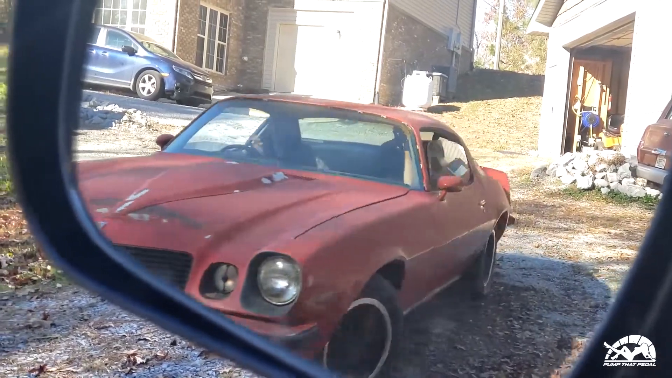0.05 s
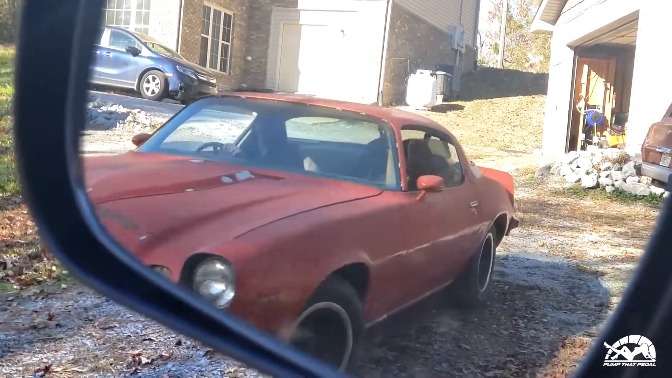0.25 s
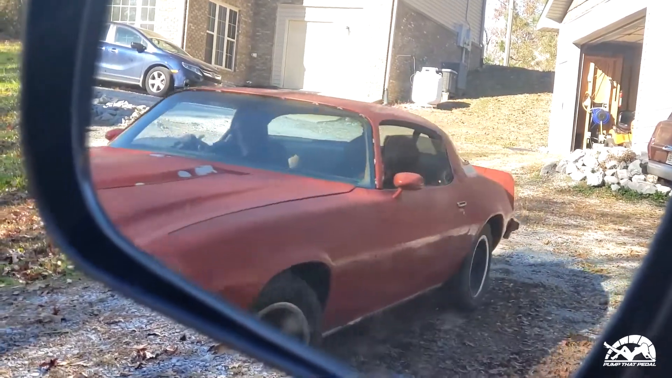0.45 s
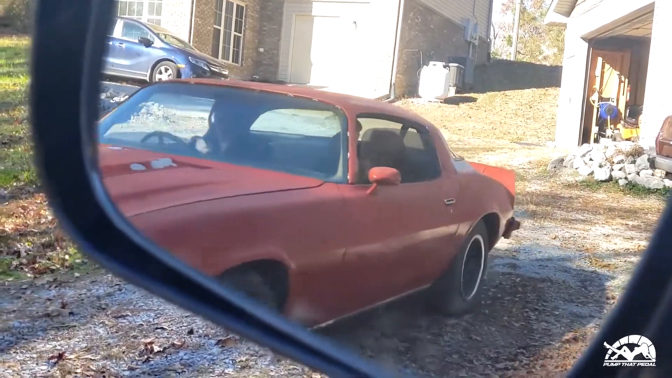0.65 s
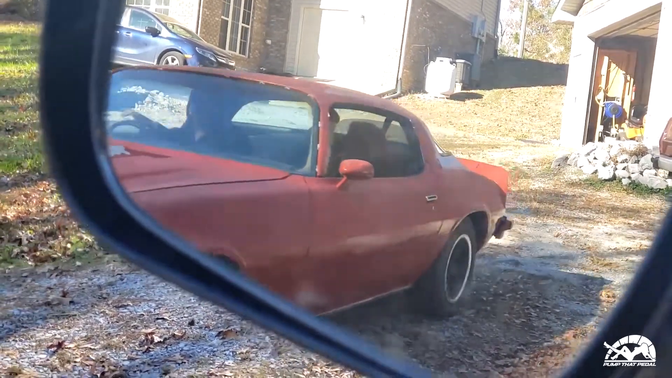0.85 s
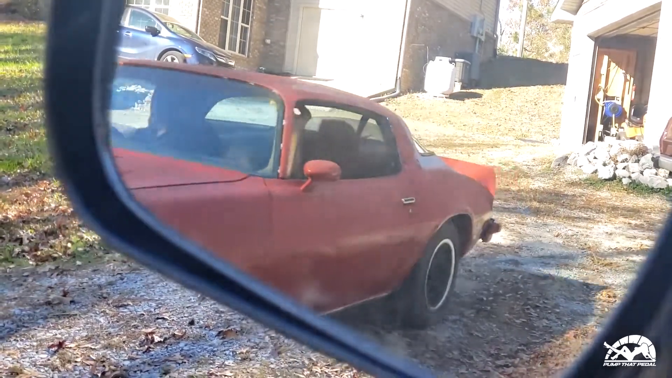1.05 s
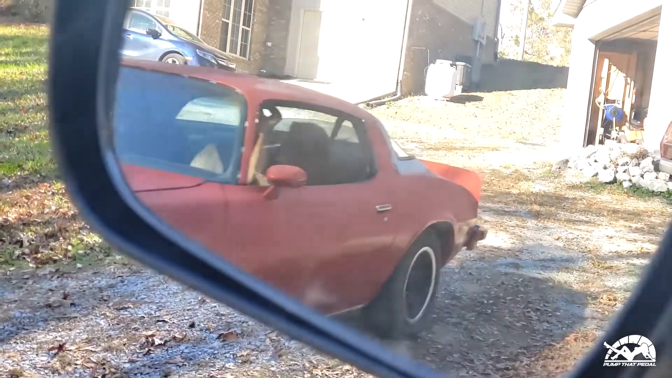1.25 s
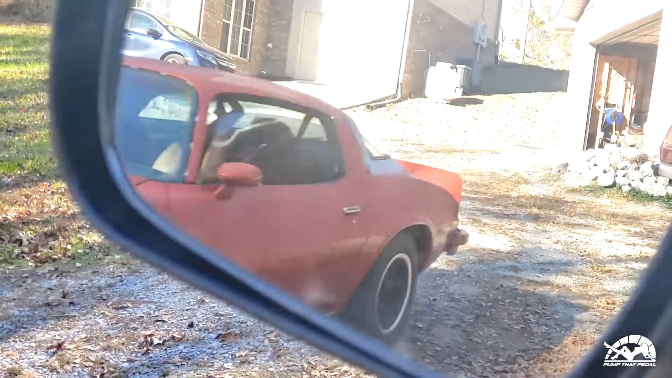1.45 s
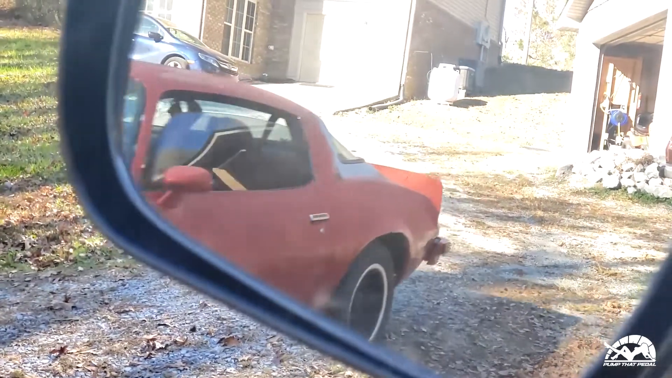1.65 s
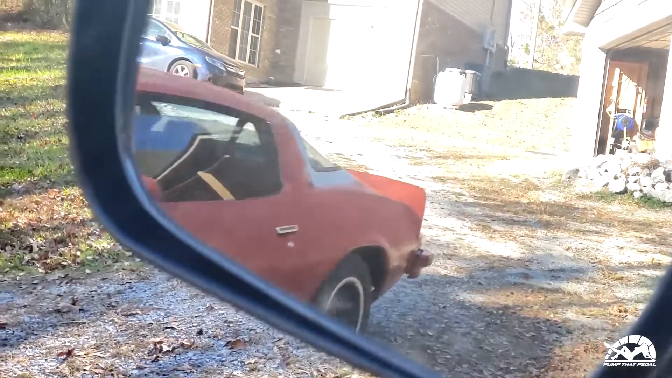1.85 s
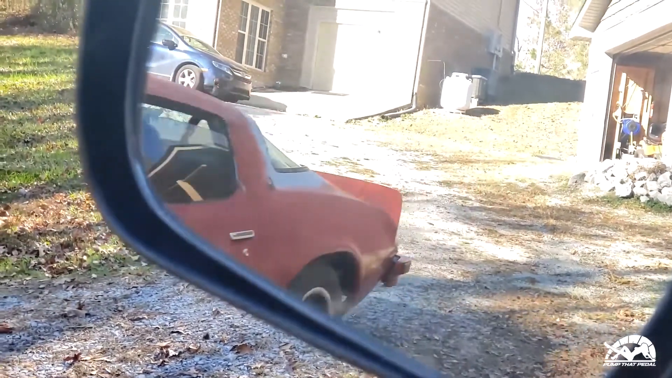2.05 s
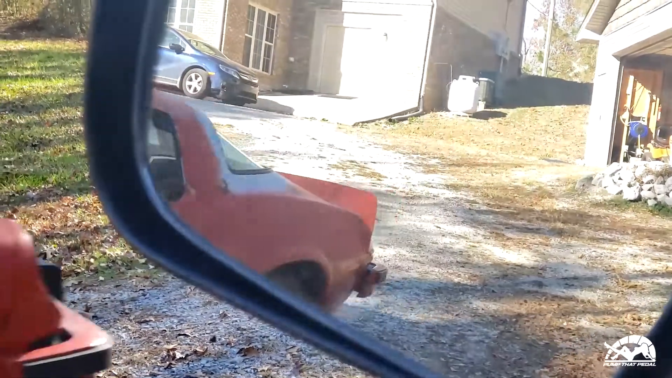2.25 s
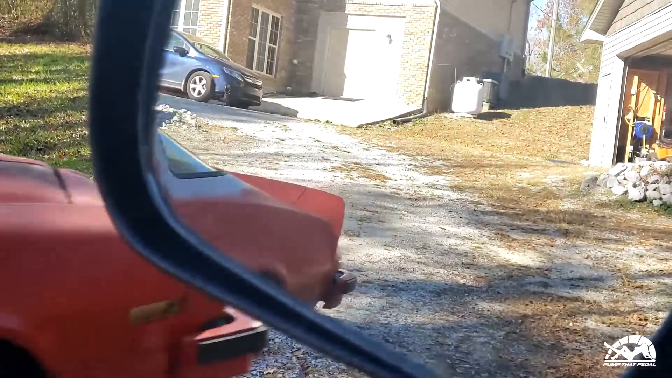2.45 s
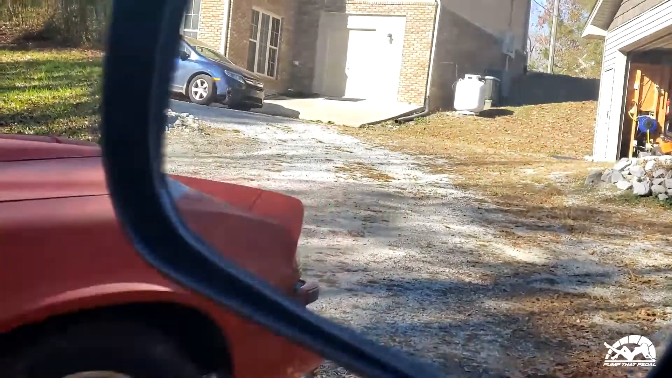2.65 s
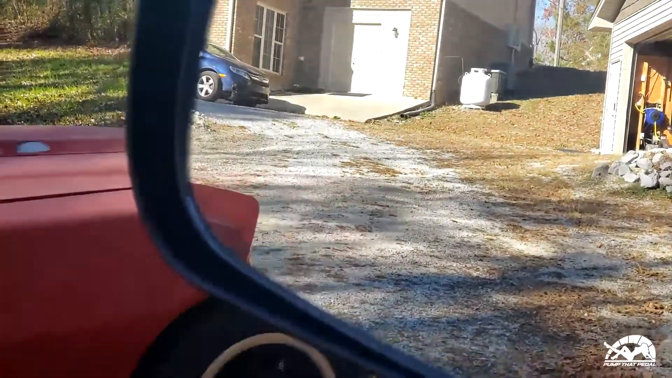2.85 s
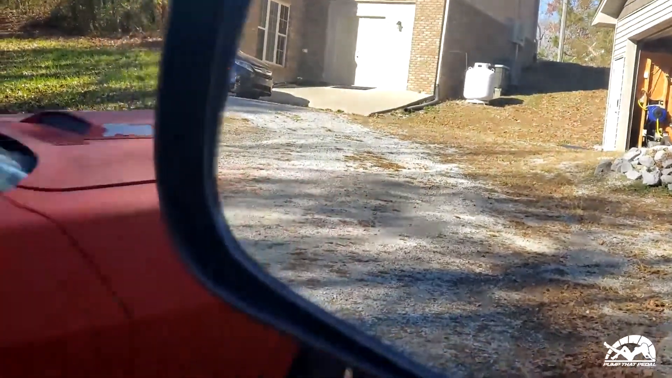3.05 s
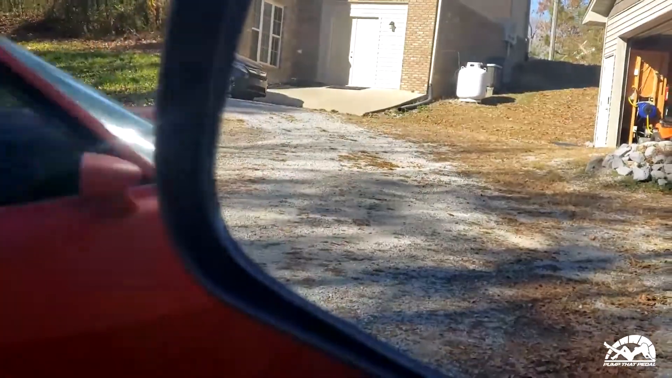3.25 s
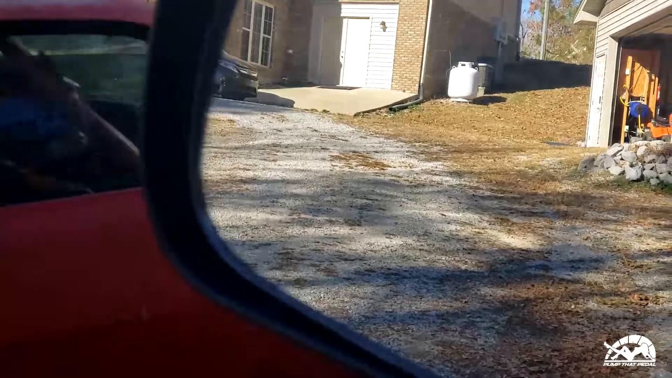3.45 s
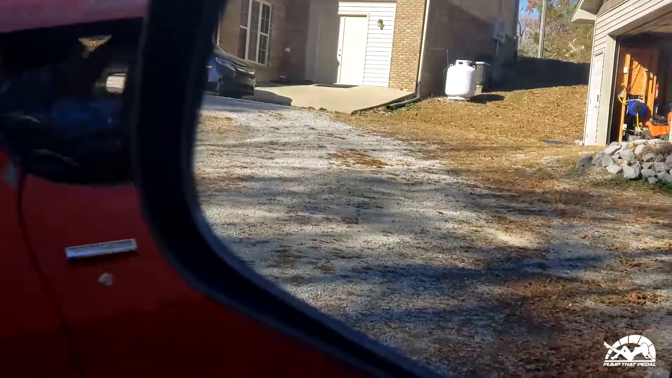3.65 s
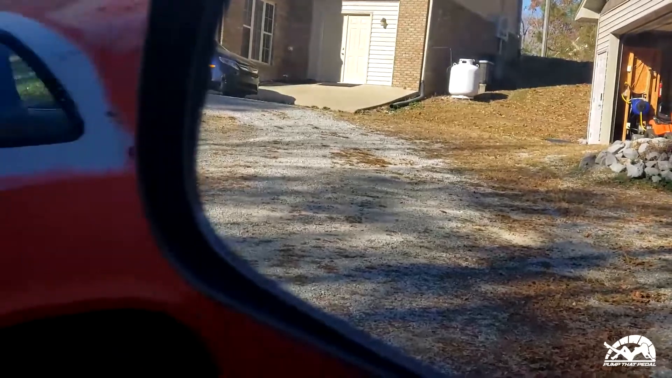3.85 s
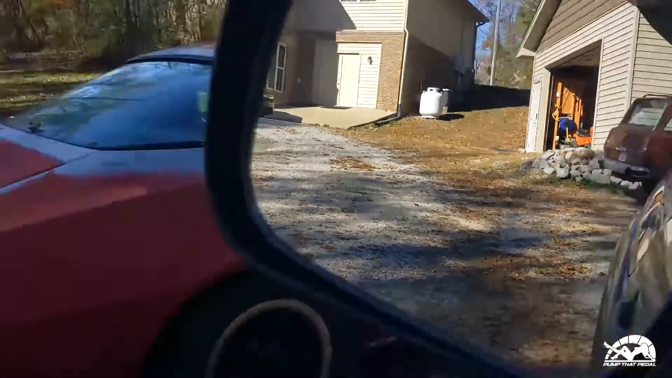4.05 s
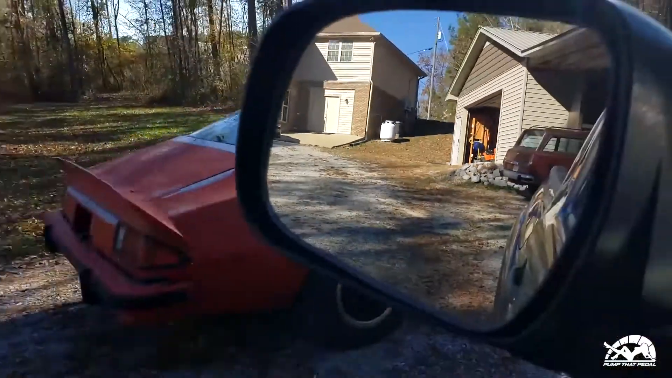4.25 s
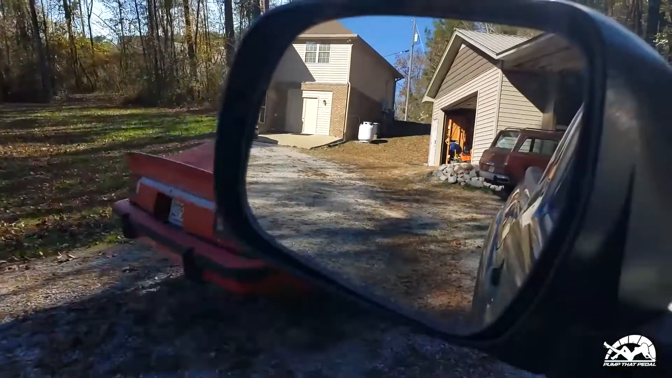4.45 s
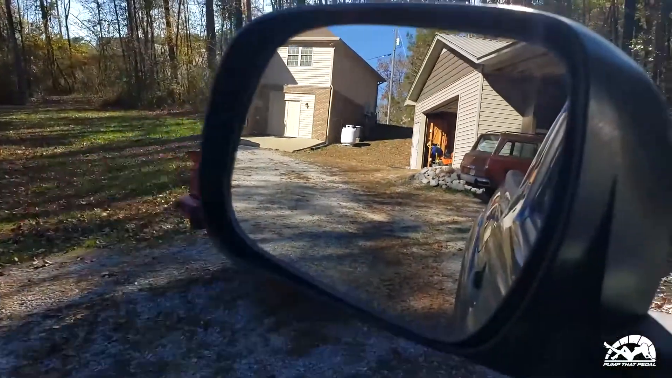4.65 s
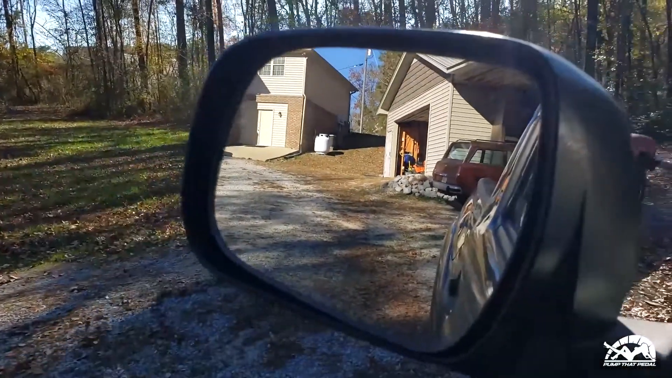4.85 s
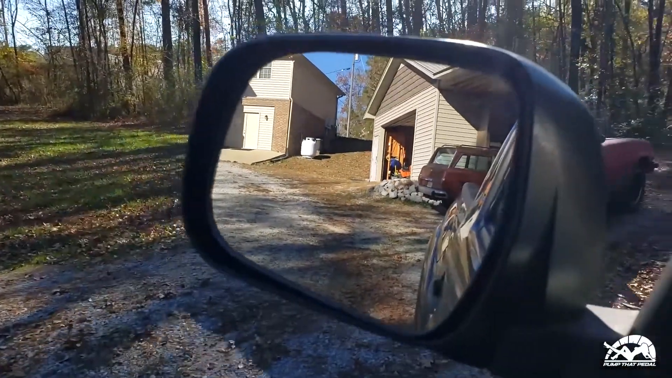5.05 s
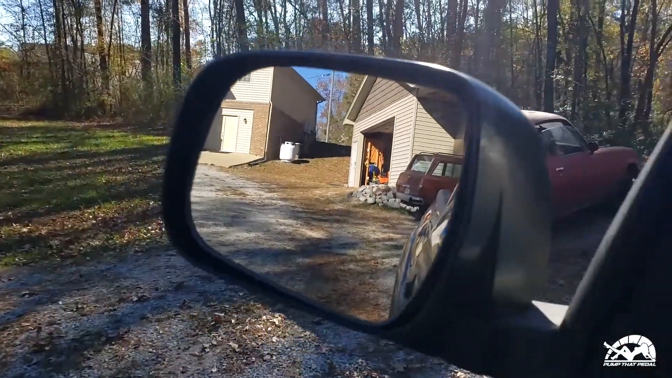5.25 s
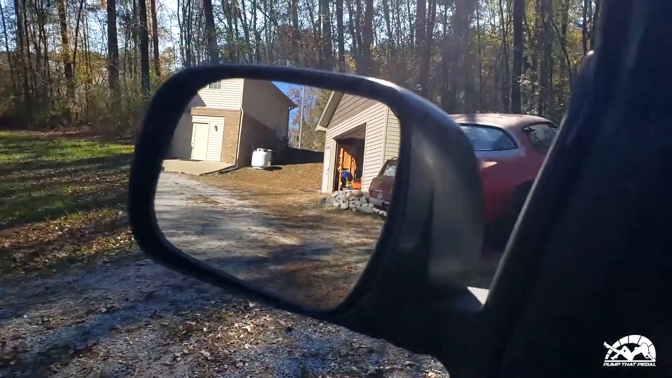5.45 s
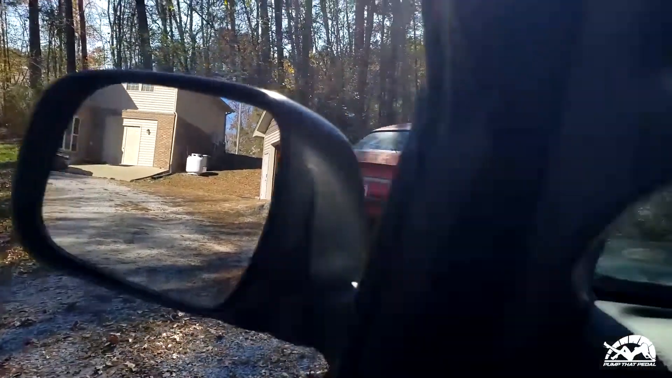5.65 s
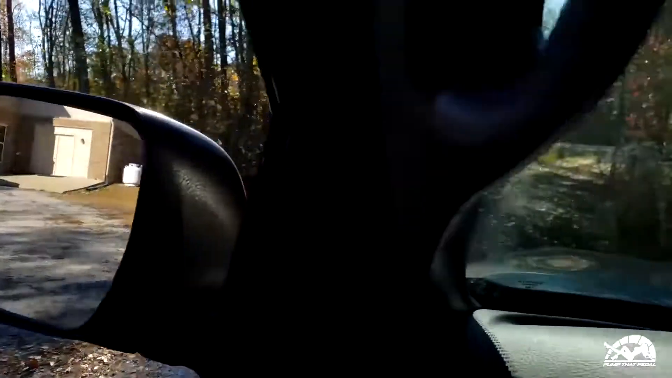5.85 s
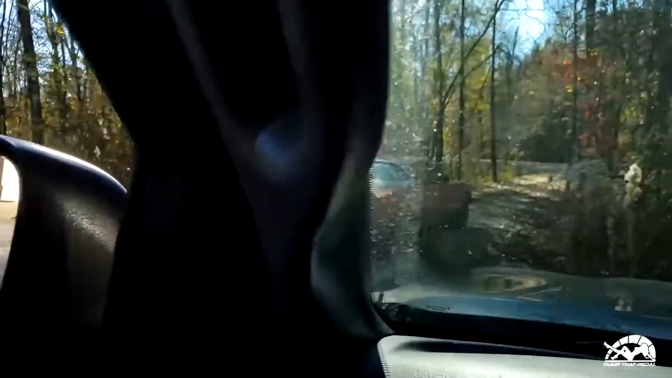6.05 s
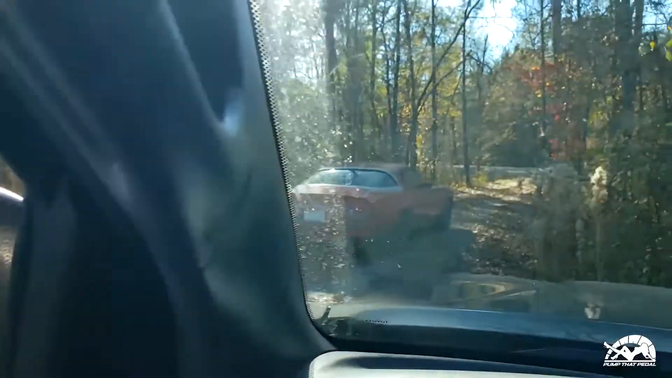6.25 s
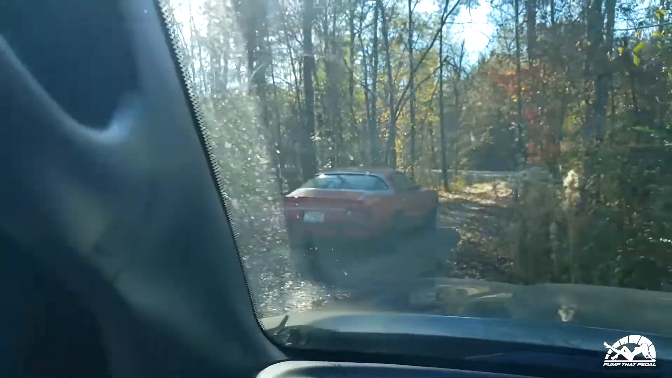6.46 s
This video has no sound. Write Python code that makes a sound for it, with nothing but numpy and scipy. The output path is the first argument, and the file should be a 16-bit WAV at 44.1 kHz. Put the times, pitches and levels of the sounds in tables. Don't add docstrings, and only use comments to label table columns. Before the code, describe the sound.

Outdoor stereo sound from a stationary car on a gravel drive: the slow, uneven throb of an old eight-cylinder engine gets closer, over grinding stones, sharp pebble knocks and brittle leaf crackles. The exhaust grows boomy, gulps air and revs up strongly as its tailpipes pass. Gravel detail thins, the engine note climbs, then the throttle closes and the pitch falls quickly as the car coasts away quietly.

```python
import sys
import numpy as np
from scipy import signal
from scipy.fft import rfft, irfft, next_fast_len
from scipy.io import wavfile
from scipy.ndimage import map_coordinates

SR = 44100
rng = np.random.default_rng(int(sys.argv[2]) if len(sys.argv) > 2 else 0)


def volts_from_db(level):
    exponent = np.asarray(level, float) / 20
    return 10 ** exponent


def persist_wave(psi):
    counts = np.round(np.clip(psi, -1, 1) * 32767).astype(np.int16)
    wavfile.write(sys.argv[1], SR, np.atleast_2d(counts).T)


N = 287002
TIME = np.arange(N) / SR
LIFT_OFF_S = (5.21, 5.29)
SETTLED_S = (3.8, 4.2)


def rms_one(x):
    return x / np.sqrt(np.mean(x ** 2) + 1e-20)


def in_time(rows):
    s, *columns = np.transpose(rows)
    return [np.interp(TIME, s, c) for c in columns]


def at_hz(points, hz):
    points = np.array(points)
    return np.interp(np.log(hz), np.log(points[:, 0]), points[:, 1])


def drift(rate):
    r = np.exp(-80 * np.pi * rate / SR)
    white = rng.standard_normal(N // 40 + 2002)
    slow = rms_one(signal.lfilter([1], [1, -2 * r, r * r], white)[2000:])
    return np.interp(np.arange(N) / 40, np.arange(len(slow)), slow)


def resonance(x, hz, width_hz):
    r = np.exp(-np.pi * width_hz / SR)
    poles = [1, -2 * r * np.cos(2 * np.pi * hz / SR), r * r]
    return signal.lfilter(np.array([1, 0, -1]) * (1 - r * r) / 2, poles, x)


def narrow_band(x, hz, width_hz):
    return resonance(resonance(x, hz, width_hz), hz, width_hz)


def filtered(x, order, hz, kind="low"):
    return signal.sosfilt(signal.butter(order, hz, kind, fs=SR, output="sos"), x)


def decay(length_s):
    return [1, -np.exp(-1 / (length_s * SR))]


def coloured(x, spectrum):
    size = next_fast_len(N + 4096)
    log_gain = at_hz(spectrum, np.arange(1, 2050) * SR / 4096) * np.log(10) / 20
    fold = irfft(log_gain) * np.r_[1, np.full(2047, 2), 1, np.zeros(2047)]
    response = irfft(np.exp(rfft(fold)))
    return irfft(rfft(x, size) * rfft(response, size), size)[..., :N]


def grains(per_s, spread_db):
    sizes = volts_from_db(spread_db * np.minimum(rng.exponential(1, N), 4)) * rng.choice([-1, 1], N)
    return sizes * (rng.random(N) < per_s / SR)


def spread_noise(alike):
    shared, *own = rng.standard_normal((3, N))
    return np.sqrt(alike) * shared + np.sqrt(1 - alike) * np.array(own)


# (time [s], four-stroke cycles per second [Hz])
SPEED = [(0, 6.1), (.6, 5.65), (1.05, 5.31), (1.6, 5.63), (2.2, 5.82), (2.7, 5.45), (3.2, 5.92),
         (3.48, 5.75), (3.6, 6.3), (3.8, 8.92), (4.05, 13.6), (4.3, 16.2), (4.63, 18.25), (5.2, 20.2),
         (5.3, 20.6), (5.4, 17.9), (5.8, 12.3), (6.4, 7.25)]


def crank():
    cycle_hz, = in_time(SPEED)
    return cycle_hz, np.cumsum(cycle_hz) / SR


def firing_tones(cycle_hz, turns, even_db):
    octave_db = -0.5 - np.clip(7 * (cycle_hz - 6), 0, 26.5)
    octave_db += np.interp(cycle_hz - 17.5, [0, 1, 3.3], [0, 11, 15])
    octave_db -= np.interp(TIME, LIFT_OFF_S, [0, 18]) * (cycle_hz > 9)
    even_db = even_db + np.interp(cycle_hz, [6.3, 7.5], [-3.5, 0])
    octave = volts_from_db(octave_db) * np.sin(32 * np.pi * turns + 1)
    return volts_from_db(even_db) * np.sin(16 * np.pi * turns) + octave


UNEVEN_DB = [-5, -10, -4, -6, -1.5, -7, -7]
UNEVEN_FAST_DB = [-3, -6, -5, 0, -5, -3, -1]
ORDER_TRIM = {4: -8, 6: -4, 7: -5, 9: 3, 10: 2, 11: 4, 13: 2, 18: -5, 19: -12, 23: -4}
# (cycle rate [Hz], level [dB])
BANK_DIP = [(11, 0), (14, -8), (18.5, -8), (20, 0)]
# (frequency [Hz], level [dB])
PIPE = [(20, -45), (45, -30), (60, -15), (75, 0), (92, -1), (107, -8), (125, -3), (150, -6), (175, -9),
        (210, -11), (240, -14), (280, -16), (330, -13), (420, -28)]
# (time [s], level of the 151 Hz mode [dB])
BARK = [
    (0, -5),
    (2.2, 8),
    (3.3, 2),
    (3.5, -4),
    (3.62, 8),
    (4.12, -2),
    (4.3, -15.5),
]


def uneven_orders(cycle_hz, turns, wobble_db=1.5):
    coarse = slice(None, None, 20)
    cycle_hz, turns, time = cycle_hz[coarse], turns[coarse], TIME[coarse]
    bark_db = in_time(BARK)[0][coarse]
    coasting = np.interp(time, LIFT_OFF_S, [0, 1])
    thinning_db = 17 * np.interp(time, *zip(*sorted([(5.5, 0), (4.51, 17)]))) / 17
    thinning_db = 17 * np.interp(time, (5.5, 4.51), [0, 1])
    orders, power = 0, 0
    for k in range(2, 48):
        if k in (8, 16):
            continue
        hz = k * cycle_hz
        slow_fast_db = [UNEVEN_DB[k % 8 - 1], UNEVEN_FAST_DB[k % 8 - 1]]
        db = np.interp(cycle_hz, [15, 19.5], slow_fast_db) * (k % 8 > 0)
        db += ORDER_TRIM.get(k, 0) * np.interp(cycle_hz, [17.5, 20], [1, 0])
        if k == 12:
            db += np.interp(cycle_hz, *np.transpose(BANK_DIP))
        if k > 12:
            db -= np.interp(cycle_hz, [16, 19], [0, 6])
        db -= {11: 10, 20: 3, 21: 4}.get(k, 0) * np.interp(cycle_hz, [11, 14], [0, 1])
        db += coasting * 7 / (1 + ((hz - 120) / 12) ** 2)
        db -= min(2.6 * max(k - 21, 0), 13) + coasting * np.clip((hz - 140) / 4, 0, 16)
        db -= np.clip((hz - 175) / 2, 0, 4 if k == 12 else 10)
        db -= thinning_db / (1 + (hz / 99.3) ** 6)
        gain = volts_from_db(db + at_hz(PIPE, hz) + bark_db / (1 + ((hz - 151.3) / 50) ** 2))
        power = power + gain ** 2
        tone = np.sin(2 * np.pi * (k * turns + rng.random()))
        orders = orders + gain * volts_from_db(wobble_db * drift(0.33)[coarse]) * tone
    return signal.resample_poly(orders / np.sqrt(power), 20, 1)[:N]


# (frequency [Hz], width [Hz], level [dB])
BOOM = [(76, 22, 0), (95, 20, -3), (120, 22, -4), (146, 25, -13)]


def misfires(cycle_hz, turns):
    fired = np.diff(np.floor(8 * turns), prepend=0)
    kicks = fired * rng.standard_normal(N) / np.sqrt(cycle_hz) + 1e-18
    rumble = 0
    for k, (hz, width, db) in enumerate(BOOM):
        rumble = rumble + (-1) ** k * volts_from_db(db) * resonance(kicks, hz, width)
    level_db = -9 - 1.5 * np.maximum(cycle_hz - 13.5, 0)
    level_db += 14 * np.exp(-((TIME - 5.29) / 0.1) ** 2)
    return volts_from_db(level_db) * rms_one(filtered(rumble, 3, [60, 170], "band"))


# (time [s], level [dB], firing tone over the uneven orders [dB])
LOAD = [(0, -38.5, 6), (.15, -35.5, 3), (.75, -31.5, -7), (1.05, -32.5, 5), (1.35, -30.5, -3),
        (2.3, -28, -5), (3.0, -23, -13), (3.5, -19.5, -34), (3.73, -21, 8), (3.88, -24.5, 16),
        (4.03, -19, -4), (4.27, -20, -2), (4.5, -24.5, 3.5), (5.05, -30, -3.5), (5.25, -30, -8.5),
        (5.65, -33.5, -1.5), (6.0, -40.5, 8.5), (6.5, -39, -11)]
# (time [s], level [dB])
STUMBLES = [(.48, -6), (1.048, -12.5), (1.46, -6.5), (3.38, -7), (3.54, -6), (2.0, -1.5), (2.22, 3.5),
            (5.31, 3), (5.87, -6), (5.99, 2.5), (6.13, -3), (6.34, -1)]


def exhaust(cycle_hz, turns):
    level_db, even_db = in_time(LOAD)
    level_db += sum(db * np.exp(-((TIME - s) / 0.04) ** 2) for s, db in STUMBLES)
    tones = firing_tones(cycle_hz, turns, even_db) + uneven_orders(cycle_hz, turns)
    return volts_from_db(level_db) * (np.sqrt(2) * tones + misfires(cycle_hz, turns))


# (frequency [Hz], width [Hz], level against the belt [dB])
BAY = [(3045, 380, -4.5), (4420, 510, -4)]
# (time [s], level [dB])
BONNET = [
    (0, 18.5),
    (1.3, 21),
    (2.4, -34),
    (4, -4),
]


def engine_bay():
    belt = volts_from_db(-33.5) * rms_one(narrow_band(rng.standard_normal(N), 6110, 150))
    gear = sum(volts_from_db(db) * rms_one(narrow_band(rng.standard_normal(N), hz, width)) for hz, width, db in BAY)
    return volts_from_db(in_time(BONNET)[0]) * (belt + volts_from_db(-30) * gear)


# (frequency [Hz], spectral level [dB per Hz])
GRAVEL = [(120, -30), (200, -6), (260, 3), (330, -2.5), (430, -4.5), (530, -1.5), (600, -5), (680, 1.5),
          (866, -1), (1190, -8.5), (1900, -7), (2640, -15), (3300, -15.5), (4330, -21.5), (5410, -29),
          (6140, -22), (7090, -61.5), (9000, -60.5), (11700, -61), (19800, -120)]


def gravel(level_db):
    grind = rms_one(grains(1200 * volts_from_db(3.2 * drift(16)), spread_db=5.0))
    grind *= np.interp(TIME, SETTLED_S, [.8, .08])
    rush = rms_one(coloured(grind + spread_noise(alike=.45), GRAVEL))
    return volts_from_db(level_db + 1.2 * drift(7)) * (rush + engine_bay())


def chips(level_db):
    pitches_hz = (560, 780, 1000, 1150, 1500)
    rings = 0
    for hz in pitches_hz:
        clicks = grains(70 / len(pitches_hz), spread_db=2.5) + 1e-18
        rings = rings + resonance(clicks, hz, .3 * hz) * np.sqrt(1 / hz)
    return volts_from_db(level_db - 8) * rms_one(rings)


# (time [s], level [dB])
RUSH = [(0, -54), (2.5, -57.5), (3.2, -37), (3.6, -48), (4, -46.5), (4.2, -39.5), (4.6, -40.5), (5.0, -43),
        (5.25, -39.5), (5.4, -39), (5.8, -52.5), (6.5, -79)]
# (frequency [Hz], spectral level [dB per Hz])
ROAR = [(250, -18), (340, -3), (470, -13), (580, 0), (720, 0), (780, -10), (870, -4), (1000, -7),
        (1700, -12), (1820, -10), (2300, -16), (2700, -32), (3800, -33), (8000, -52)]


def roar(cycle_hz, turns):
    puffs = 1 + .076 * np.cos(16 * np.pi * turns) + .3 * np.cos(10 * np.pi * turns)
    late = turns + .0002 * cycle_hz * drift(40)
    cylinder = np.floor(8 * np.maximum.accumulate(late)).astype(int)
    strength_db = np.array([0, -10, -3, -16, -1, -7, -18, -9])
    fronts = np.diff(cylinder, prepend=0) * volts_from_db(strength_db)[cylinder % 8]
    rattle = rng.standard_normal(600) * np.exp(-np.arange(600) / (.004 * SR))
    rasp = rms_one(filtered(signal.fftconvolve(fronts, rattle)[:N], 2, 1500))
    gas = puffs * spread_noise(alike=.6) + np.interp(TIME, LIFT_OFF_S, [.9, .1]) * rasp
    return volts_from_db(in_time(RUSH)[0] + 1.8 * drift(3.4)) * rms_one(coloured(gas, ROAR))


# (frequency [Hz], width [Hz], level against the roar, throttle open [dB], shut [dB])
WHINES = [(700, 55, -7, -16), (600, 45, -9, -22), (840, 40, -15, -8), (1820, 80, -15, -24),
          (2020, 100, -24, -15), (3850, 200, -26, -35), (3620, 260, -35, -24), (4690, 200, -40, -29),
          (5350, 250, -34, -27), (5780, 200, -34, -28)]


def whines():
    white, song = rng.standard_normal(N), 0
    for hz, width, *open_shut_db in WHINES:
        level = volts_from_db(np.interp(TIME, LIFT_OFF_S, open_shut_db))
        song = song + level * rms_one(narrow_band(white, hz, width))
    return volts_from_db(in_time(RUSH)[0]) * song


# (time [s], peak level [dB], length [s])
CRUSH = [(0.5, -54, 0.0095), (1.235, -27.5, 0.042), (1.253, -44, 0.024), (1.56, -56, 0.017),
         (1.845, -38, 0.012), (2.068, -41, 0.014), (2.088, -46, 0.01), (2.17, -37, 0.016),
         (2.273, -63, 0.022), (2.664, -41, 0.023), (2.681, -35.5, 0.056), (2.72, -54, 0.025),
         (2.764, -39, 0.013), (2.825, -40, 0.036), (3.063, -49, 0.028), (3.105, -40, 0.033),
         (3.161, -41, 0.013), (3.284, -46, 0.033), (3.383, -37, 0.013), (3.396, -27, 0.037),
         (3.694, -38, 0.018), (3.724, -39, 0.035), (3.968, -35.5, 0.05), (3.995, -33.5, 0.035),
         (4.407, -52, 0.067), (4.506, -52, 0.061), (4.612, -51, 0.016), (4.89, -49, 0.044),
         (5.29, -57.5, 0.61), (5.349, -59, 0.0097), (5.405, -70, 0.011), (5.66, -68, .012),
         (5.594, -61, 0.015)]
# (time [s], peak level [dB])
SNAPS = [(0.3172, -39), (0.446, -36), (0.505, -30), (0.595, -30), (0.7577, -35), (0.7853, -25),
         (0.896, -32), (1.033, -32), (1.1966, -37), (1.243, -29), (1.3588, -33), (1.422, -29),
         (1.568, -31.5), (1.673, -27.5), (1.8403, -34), (1.9784, -41.5), (2.0635, -18), (2.072, -18),
         (2.0808, -19), (2.0847, -23), (2.095, -21), (2.1107, -22.5), (2.1377, -31), (2.171, -21),
         (2.2695, -31), (2.281, -29), (2.4037, -37), (2.6668, -35), (2.6848, -38), (2.699, -26),
         (2.717, -26), (2.726, -32), (2.7611, -36), (2.8115, -36), (2.818, -32.5), (2.9496, -32),
         (2.99, -31), (3.049, -38), (3.074, -32), (3.114, -42), (3.163, -34), (3.1807, -26), (3.269, -21.5),
         (3.276, -28), (3.312, -36), (3.3744, -32), (3.3952, -30), (3.4042, -39.5), (3.414, -25),
         (3.6965, -47), (3.7234, -33), (3.7747, -29), (3.9809, -39), (3.9926, -33), (4.4154, -38),
         (4.4518, -41), (4.52, -47), (4.6045, -42), (5.5853, -47), (6.4023, -54)]
# (frequency [Hz], spectral level [dB per Hz])
LEAVES = [(1470, -10), (2500, 1), (3090, 0.5), (5050, -1.5), (6550, -1.5), (7600, -7.5), (9500, -4),
          (12400, -0.5), (15100, -0.5), (16100, -17.5), (16500, -11.5)]


def leaves(tyre_db):
    rustle_db = tyre_db - 16 - 7.5 * np.clip((TIME - 4.22) / 0.32, 0, 1)
    rustle_db -= 22 * np.maximum(TIME - 5.2, 0)
    effort = np.zeros(N)
    for s, db, length in CRUSH:
        after = slice(round(s * SR), round((s + 3 * length) * SR))
        age = TIME[after] - s
        effort[after] += volts_from_db(db - 10.5) * np.minimum(age / 0.00095, 1) * np.exp(-(age / length) ** 2)
    cracks = rms_one(signal.lfilter([1], decay(.0015), np.abs(grains(300, spread_db=1.6))))
    gate = effort * (1.2 * cracks + .2)
    gate += volts_from_db(rustle_db + 1.5 * drift(6)) * (.2 * cracks + .9)
    s, db = np.transpose(SNAPS)
    snapped = np.bincount((s * SR).astype(int), volts_from_db(db - 12.5), N)
    gate += signal.lfilter([1], decay(.0025), snapped + 1e-18)
    return gate * rms_one(coloured(spread_noise(alike=.35), LEAVES)) / 1.17


# (time [s], peak level [dB], frequency [Hz])
STONES = [(0.033, -16, 1530), (0.188, -27, 1150), (0.234, -27, 606), (0.505, -28, 1120), (0.616, -22, 630),
          (0.631, -22.5, 1150), (0.638, -18.5, 900), (0.661, -22.5, 1090), (0.786, -26.5, 694),
          (0.924, -36, 600), (1.41, -20, 710), (1.417, -15, 860), (1.514, -25, 665), (1.672, -14.5, 490),
          (1.715, -18, 1660), (1.877, -24, 1240), (2.026, -21.5, 673), (2.133, -23.5, 890),
          (2.171, -21.5, 563), (2.28, -18.5, 930), (2.601, -18.5, 685), (2.642, -21, 450),
          (2.769, -18.5, 710), (2.956, -15.5, 690), (2.966, -18, 625), (2.972, -26, 650), (3.118, -19, 655),
          (3.201, -17, 820), (3.276, -20.5, 520), (3.404, -20, 547), (3.553, -19.5, 940), (3.62, -22, 706),
          (3.744, -25, 780), (4.782, -32, 1000), (5.015, -42, 1040), (5.287, -29.5, 910)]
# (time [s], peak level [dB], frequency [Hz])
PEBBLES = [(0.093, -24, 1190), (0.214, -49, 657), (0.302, -26.5, 606), (0.607, -24.5, 505),
           (0.878, -37, 655), (0.896, -29, 509), (1.279, -27, 536), (1.318, -48, 686), (1.566, -30, 640),
           (1.62, -34, 565), (1.75, -44, 581), (1.79, -28, 1200), (1.928, -40, 477), (1.985, -27.5, 1300),
           (2.265, -39, 1080), (2.737, -21.5, 802), (2.808, -21.5, 799), (2.914, -35, 778),
           (2.93, -24.5, 729), (2.993, -26, 530), (3.297, -19.5, 1290), (3.313, -26, 493),
           (3.533, -26.5, 584), (3.668, -29, 705), (3.776, -21.5, 710), (4.344, -38, 646),
           (4.368, -33, 690), (4.758, -34, 794), (5.045, -46, 630), (5.412, -45, 842), (5.531, -50, 830),
           (5.653, -42, 487), (5.81, -48, 633), (5.877, -52, 506), (5.901, -47, 670), (6.08, -43.5, 900),
           (6.255, -47, 700), (6.324, -46, 818), (6.46, -51, 470)]


def stones():
    out, time = np.zeros(N + 4000), np.arange(4000) / SR
    for s, db, hz in [*STONES, *[(s, db - 0.5, hz) for s, db, hz in PEBBLES]]:
        chance, size = rng.random((2, 4000))
        slips = (chance < 1100 / SR) * (2 * size - 1) * np.exp(-time / .009)
        slips[0] = 1.3
        pop = resonance(slips, hz, 0.32 * hz) - 0.35 * resonance(slips, 2.3 * hz, 1.4 * hz)
        at = round(s * SR)
        out[at:at + 4000] += volts_from_db(db) * pop / np.abs(pop).max()
    return filtered(out[:N], 2, [300, 2700], "band")


# (time [s], level [dB])
THROAT = [
    (3.4, -47),
    (3.65, -36),
    (4.0, -38),
    (4.4, -42),
    (4.7, -54),
    (5.3, -66),
]
# (frequency [Hz], width [Hz], level [dB])
THROAT_HZ = [(220, 63, 1.5), (321, 79, -2.5), (392, 87, -6.5)]


def intake(turns):
    air = (1 + .7 * np.cos(16 * np.pi * turns)) * rng.standard_normal(N)
    hollow = sum(volts_from_db(db) * narrow_band(air, hz, width) for hz, width, db in THROAT_HZ)
    return volts_from_db(in_time(THROAT)[0]) * rms_one(hollow)


def hidden(x):
    return x + np.interp(TIME, (4.13, 4.6), [0, 1]) * (filtered(x, 1, 1980) - x)


def yard(x, t60=0.09):
    time = np.arange(8000) / SR
    tails = rng.standard_normal((2, 8000)) * volts_from_db(-60 * time / t60) * (time > .001)
    return signal.fftconvolve(x[None], tails / np.sqrt(np.sum(tails[0] ** 2)), axes=1)[:, :N]


# (frequency [Hz], width [Hz], share added [ratio])
FRAME = [(800, 200, -.6), (1170, 380, 1.0), (1590, 240, -.75)]


def framed(x):
    echo = sum(share * resonance(x, hz, width) for hz, width, share in FRAME)
    return x + np.interp(TIME, (0.18, 2.7), [1, .3]) * echo


# (time [s], lead of the left port [samples])
LEAD = [
    (1.2, 25),
    (2.2, 21),
    (2.8, 14),
    (3.8, 8),
    (4.4, -2),
    (5.3, -2),
    (5.8, 3),
    (6.3, 14),
]
# (frequency [Hz], level [dB])
SHADE_BEHIND = [(60, 2.5), (110, 2.5), (200, 3.0), (380, 4.0), (700, -0.5), (1290, 3.0), (2380, 12.5),
                (4400, 5.0), (8120, 1.5), (15000, 4.5)]
SHADE_AHEAD = [(60, 2.5), (110, 3.0), (200, 4.0), (380, 5.0), (700, 7.0), (1290, 8.5), (2380, 10.5),
               (4400, 9.0), (8120, 10.0), (15000, 10.5)]


def ports(boom, rest):
    lead, = in_time(LEAD)
    low = signal.sosfiltfilt(signal.butter(3, 810, fs=SR, output="sos"), rest[0])
    left = 0
    for x, share in ((boom[0] + rest[0] - low, 1), (low, 0.39)):
        left = left + map_coordinates(x, [np.arange(N) + share * lead], order=3, mode="nearest")
    behind = coloured(boom[1] + rest[1], np.array(SHADE_BEHIND) * [1, -1])
    ahead = coloured(boom[1] + rest[1], np.array(SHADE_AHEAD) * [1, -1])
    return np.array([left, behind + np.interp(TIME, (1.4, 4.33), [0, 1]) * (ahead - behind)])


# (time [s], level [dB])
TYRES = [(0, -39.5), (.65, -39.5), (.95, -43), (1.35, -39), (1.7, -37.5), (2.4, -40), (3.2, -38.5),
         (3.45, -45), (3.75, -38.5), (4.3, -42), (4.7, -39.5), (5.2, -44.5), (5.4, -45), (6.05, -58),
         (6.5, -60.5)]


def scene():
    tyre_db, = in_time(TYRES)
    cycle_hz, turns = crank()
    boom = volts_from_db(2.3) * exhaust(cycle_hz, turns)
    grinding = hidden(gravel(tyre_db + 4.0))
    pops = volts_from_db(5.0) * stones() + chips(tyre_db - np.interp(TIME, SETTLED_S, [0, 9]))
    rest = grinding + pops + volts_from_db(7.0) * leaves(tyre_db)
    rest = rest + roar(cycle_hz, turns) + whines() + intake(turns) + volts_from_db(-12) * yard(pops)
    shudder = rms_one(filtered(spread_noise(alike=0.31), 2, [22, 45], "band"))
    low_end = boom + volts_from_db(-19.5) * yard(boom) + volts_from_db(tyre_db - 6.0) * shudder
    return ports(low_end, framed(rest)) + volts_from_db(-108) * rng.standard_normal((2, N))


def band_limit(x):
    return signal.sosfilt(signal.butter(12, 16820, fs=SR, output="sos"), x)


def record(dry):
    cut = filtered(dry, 2, 30, "high")
    cut = signal.sosfilt(signal.cheby2(12, 60, 16400, fs=SR, output="sos"), cut)
    return band_limit(cut)


dry = scene()
out = record(dry)
persist_wave(out)
```